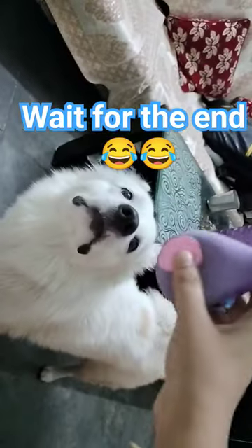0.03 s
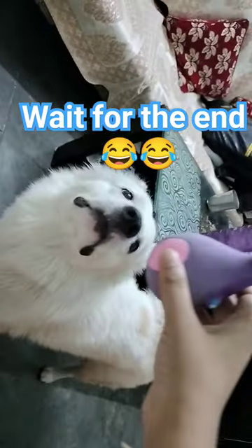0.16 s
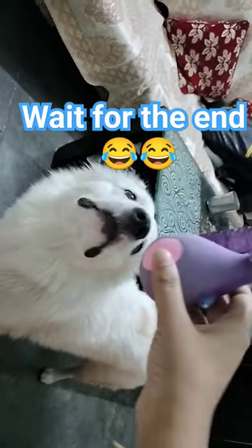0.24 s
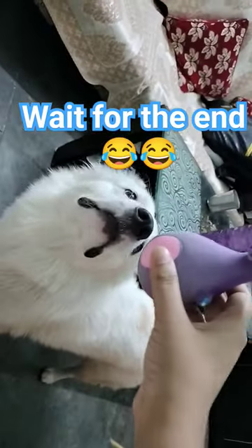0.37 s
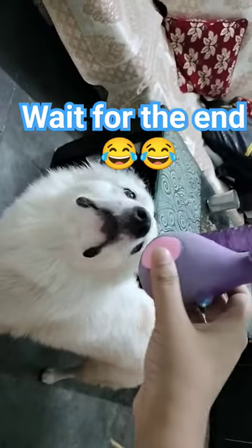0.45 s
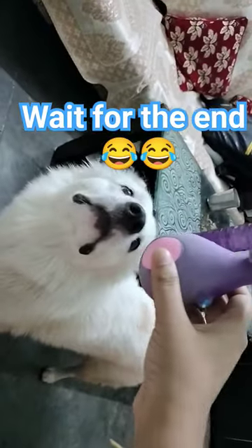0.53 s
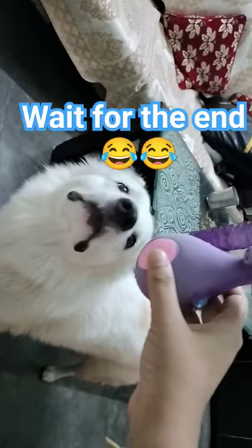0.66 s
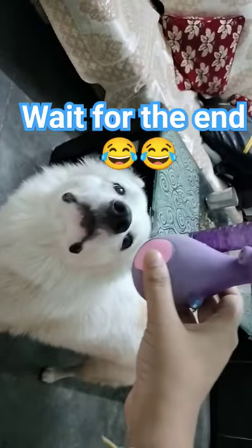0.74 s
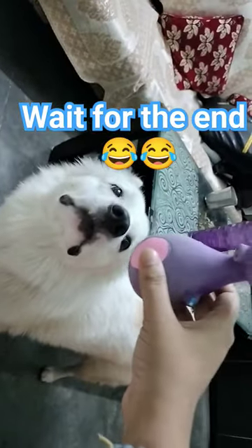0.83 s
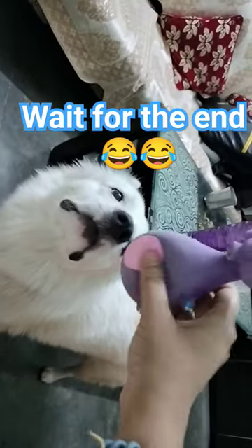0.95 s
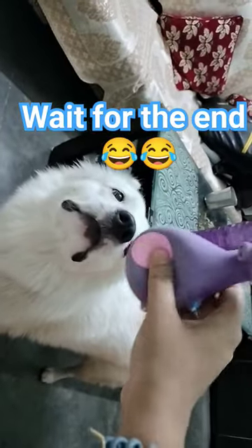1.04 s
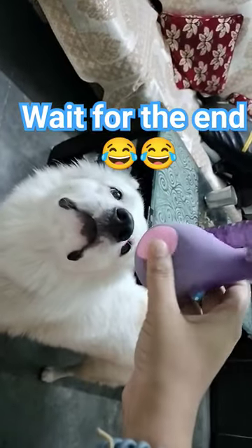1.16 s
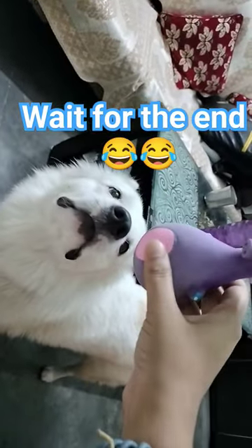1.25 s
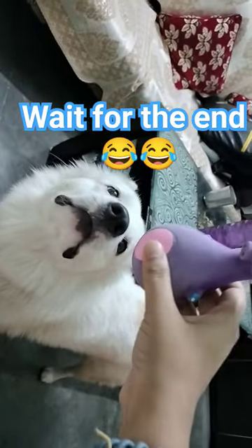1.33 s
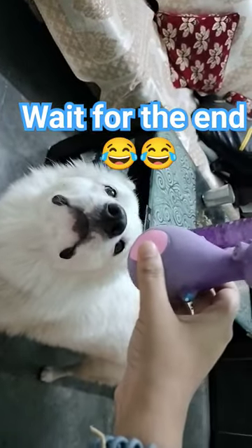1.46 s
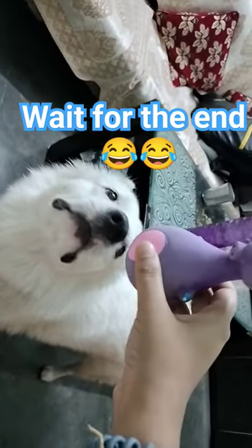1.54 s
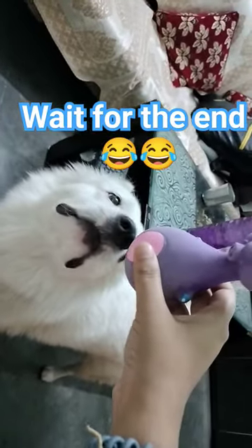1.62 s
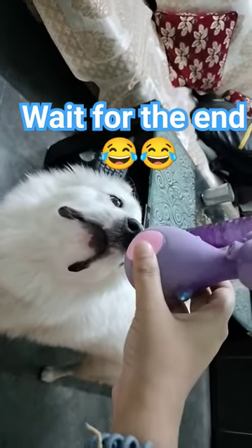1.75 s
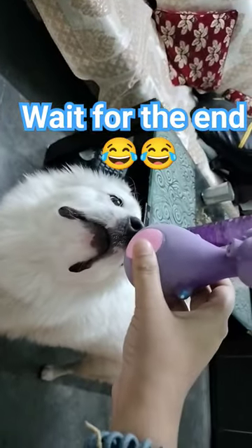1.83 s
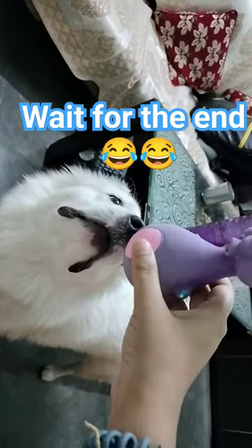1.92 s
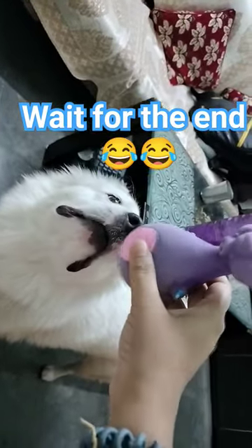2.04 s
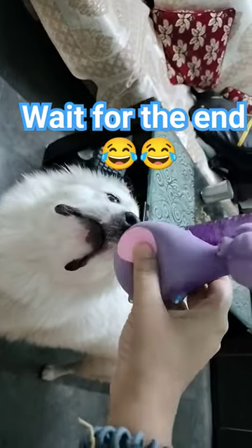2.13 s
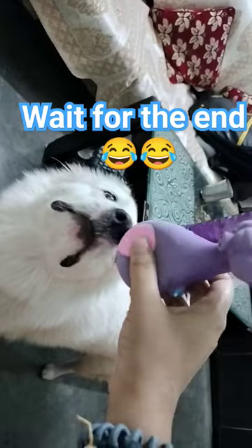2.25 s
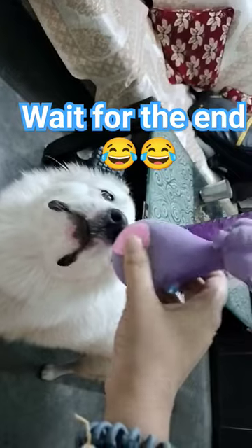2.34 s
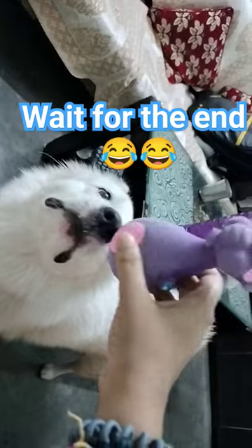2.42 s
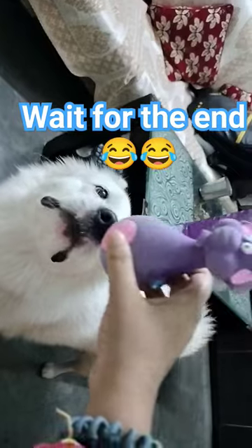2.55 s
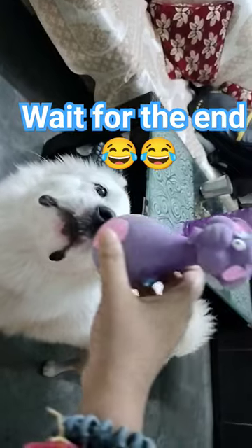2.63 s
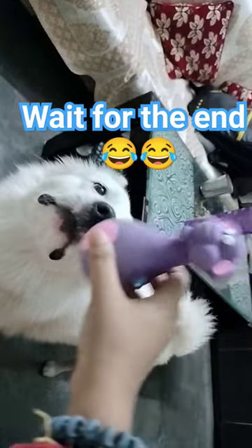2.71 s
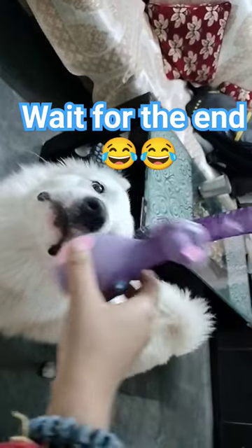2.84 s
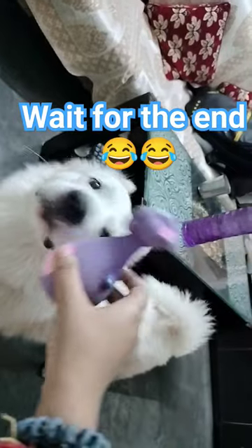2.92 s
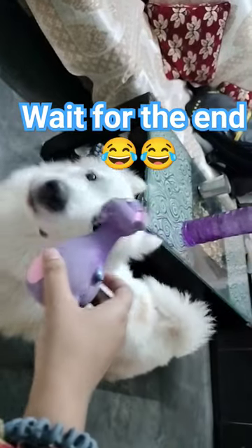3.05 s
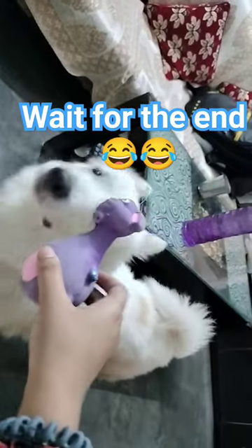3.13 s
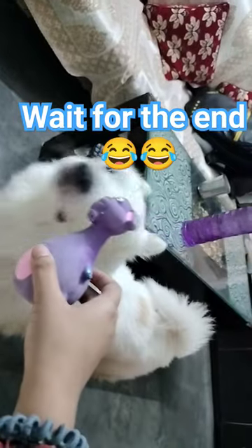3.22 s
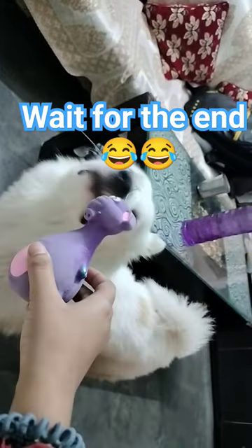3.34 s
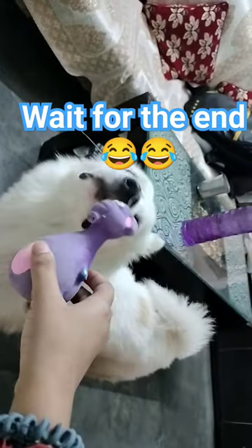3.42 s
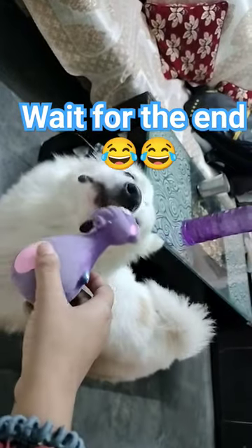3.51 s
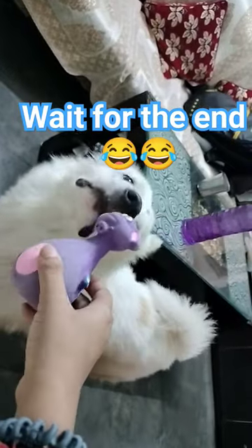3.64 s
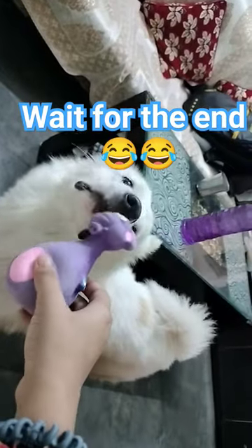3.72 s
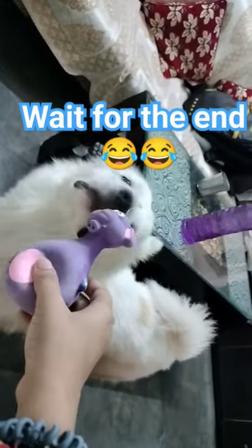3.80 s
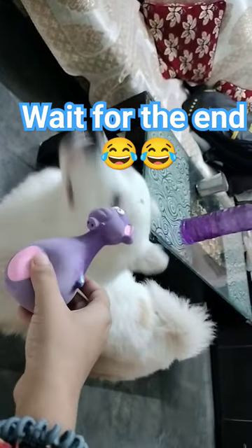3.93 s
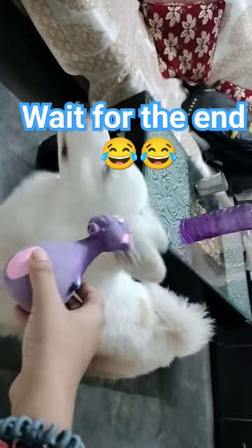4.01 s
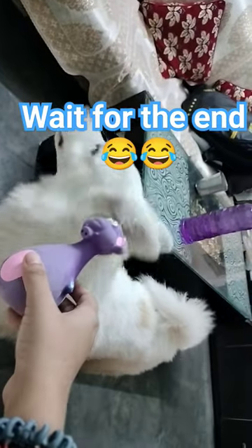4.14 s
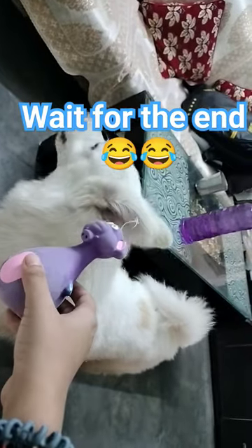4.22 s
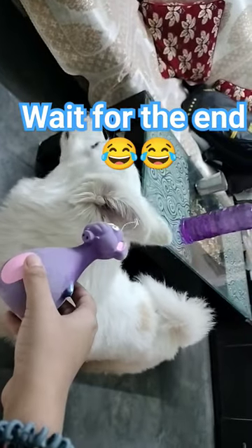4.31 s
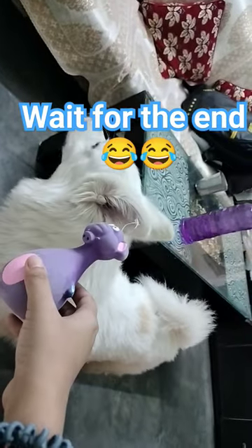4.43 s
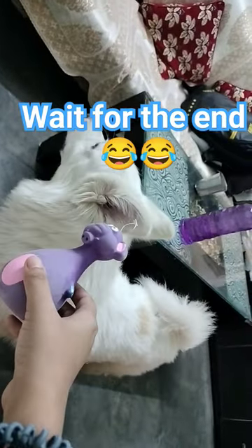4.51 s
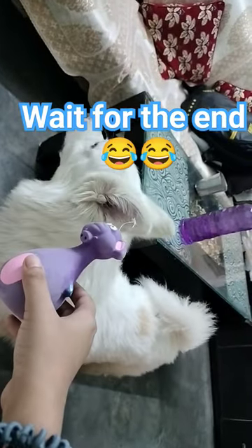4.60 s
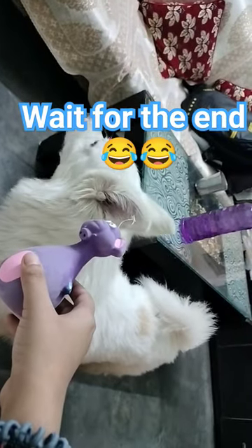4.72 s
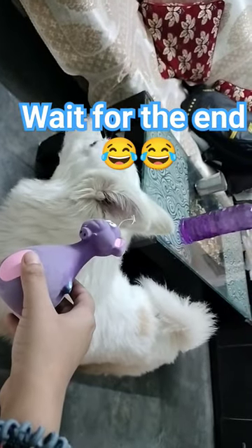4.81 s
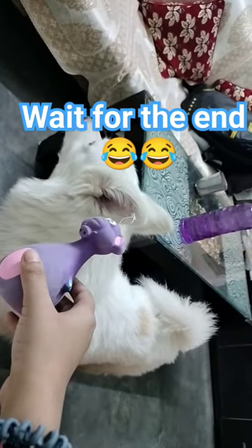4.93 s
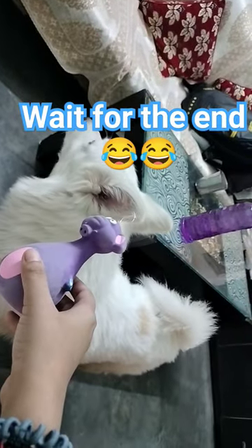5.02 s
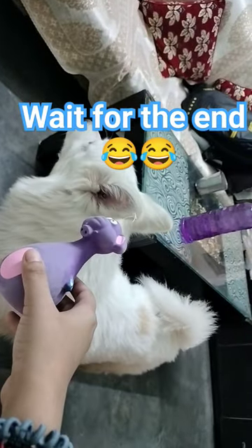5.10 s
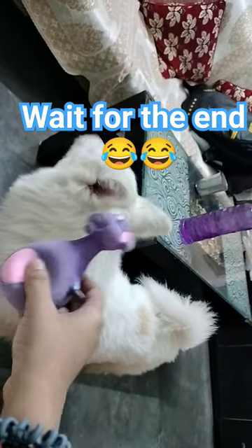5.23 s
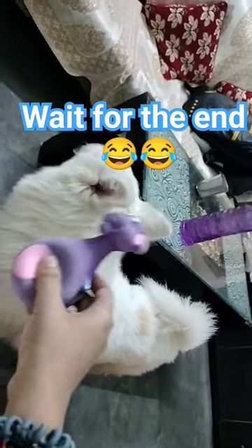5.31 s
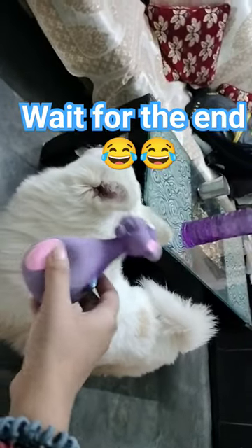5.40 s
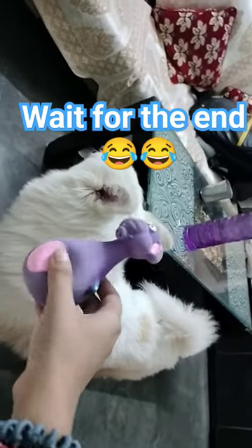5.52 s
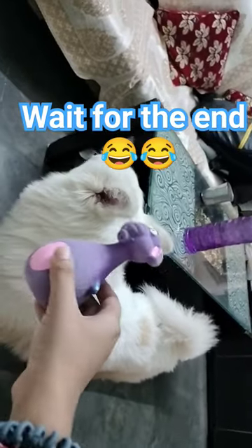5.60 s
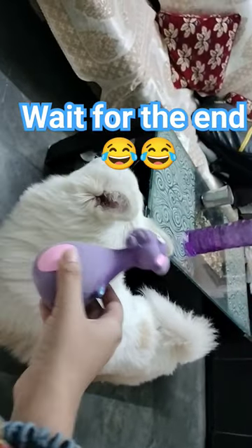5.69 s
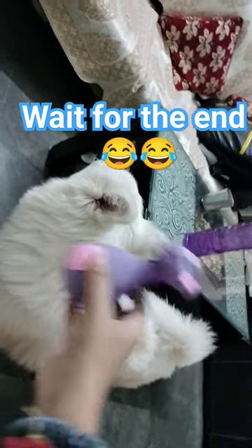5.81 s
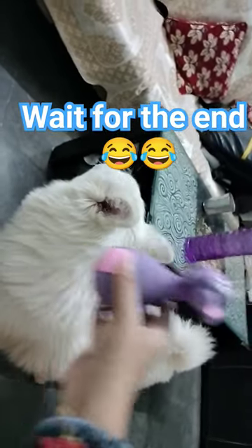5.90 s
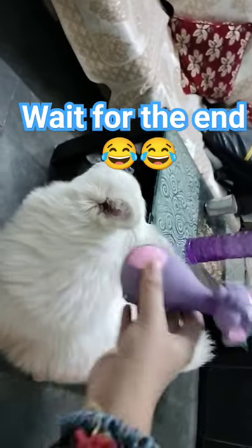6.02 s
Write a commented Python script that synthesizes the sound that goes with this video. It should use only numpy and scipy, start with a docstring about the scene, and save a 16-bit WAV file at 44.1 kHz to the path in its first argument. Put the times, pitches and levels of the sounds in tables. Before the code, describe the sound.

A rubber toy gives four high two-part squeaks and one softer single squeak, close up in a room with a low hum.

```python
"""A rubber toy squeaks as it is squeezed close to the microphone in a furnished room.
Air pushed out makes its reed buzz; the reed squeaks again, softer, as the body springs back
and sucks air in. More pressure gives a higher, louder note, and the squeaker's tube colours it.
The room rings on over low puffs of air, faint rustles and a steady household rumble."""
import sys
import numpy as np
from scipy import signal
from scipy.fft import rfft, irfft, next_fast_len
from scipy.io import wavfile
from scipy.ndimage import uniform_filter1d, map_coordinates

SR = 44100
rng = np.random.default_rng(int(sys.argv[2]) if len(sys.argv) > 2 else 0)


def unload_wav(signal):
    """Save mono or channel-first audio to the path in sys.argv[1] as 16-bit WAV at rate SR, clipped to [-1, 1]."""
    wavfile.write(
        sys.argv[1],
        SR,
        np.round(np.clip(np.atleast_2d(signal).T, -1, 1) * 32767).astype(np.int16),
    )


N = 267069
TOP_HZ = 15500

# Strokes of air, out and in. The "knee" is where the quick drop in pitch turns into a slow sag.
# (start [s], peak [s], knee [s], end [s], start pitch [Hz], peak pitch [Hz], end pitch [Hz],
#  stall time [s], level at the knee [dB], brightness [dB per overtone], octave boost [dB],
#  treble boost [dB], hiss [dB], swell above the knee [dB per 100 Hz])
SQUEEZES = [ (1.098, 1.161, 1.224, 1.236, 1291, 1780, 1270, .008, -39.5, -0.58, 1.5, -5, -4, 1.55),
            (2.225, 2.278, 2.329, 2.355, 1262, 1557, 1245, .012, -38.5, -.5, 3, 1, -5, 0.24),
            (3.908, 3.958, 4.004, 4.037, 1277, 1452, 1255, .012, -39, 1.37, 0.5, -7.5, -14, 2.5),
            (5.377, 5.429, 5.479, 5.507, 1280, 1559, 1245, .012, -39.5, 1.32, -2, -10.5, -11, 1.15), ]
REFILLS = [ (.128, .243, .296, .372, 1170, 1394, 1098, .008, -41.5, 0.25, -.5, -2.5, -13, 1.98),
           (1.263, 1.317, 1.386, 1.476, 1257, 1376, 1106, .008, -43, .1, -1.5, -2, -13.5, 1.8),
           (2.395, 2.428, 2.454, 2.617, 1200, 1243, 1147, .045, -43.5, -.1, 2, 2, -18.5, 3.7),
           (4.075, 4.142, 4.177, 4.245, 1174, 1342, 1102, .008, -42, 0.75, 0, -3, -23.5, 1.67),
           (5.538, 5.588, 5.618, 5.655, 1190, 1351, 1100, .008, -43, 0.42, 0.5, -3.5, -19, 2.94), ]
# How the reed answers to air going out and in: (knee pitch [Hz], rise curve [power], fall curve [power],
#  fade below the knee [dB per 100 Hz], brightening [dB per overtone per 100 Hz], stall loss [dB])
REED_BLOWN = (1342, 1.72, 1.9, 4.5, .4, 3)
REED_SUCKED = (1212, 2.55, 1.4, 8, .4, 5)
# How the tube colours the sound, each way: (frequency [Hz], gain [dB])
TUBE_BLOWN = [(600, -8.5), (1400, 4), (2900, 0.5), (4400, 6), (5300, 12.5), (6000, 18), (7200, 7),
              (8300, 3.5), (8700, -10), (9400, -12), (10500, -10), (12000, -7.5), (13500, -14),
              (15500, -23)]
TUBE_SUCKED = [(600, 4), (1300, 2), (2600, 2.5), (4000, 0.5), (5400, 7), (6000, 6), (6900, -7),
               (8300, -15.5), (8700, -21.5), (9400, -24.5), (10800, -12), (12000, -12), (13400, -22),
               (15500, -24)]
def rubber_toy():
    """The toy squeaks once as air is pushed out and once as it is drawn back in."""
    return reed(SQUEEZES, REED_BLOWN, TUBE_BLOWN) - reed(REFILLS, REED_SUCKED, TUBE_SUCKED)


# Air hissing past the reed: (frequency [Hz], gain [dB])
AIR_LEAK = [(300, -8.5), (2000, -16), (4000, -9.5), (7000, 1), (14000, 1.5)]
def reed(strokes, response, tube):
    """The reed chops the air into one sharp puff a cycle; air hisses past it; the tube colours both."""
    gate, (hz, level_db, bright_db, octave_db, treble_db, hiss_db) = reed_motion(strokes, response)
    unsteady = 1 + .0017 * wobble(300) + .0025 * wobble(45)
    phase = 2 * np.pi * np.cumsum(hz * unsteady) / SR
    bright_db = bright_db + .26 * wobble(60)  # the tone flutters
    buzz = np.zeros(N)
    for overtone in range(14):  # 0 is the base note
        overtone_hz = (overtone + 1) * hz
        treble_share = np.clip((overtone_hz - 8000) / 2000, 0, 1)
        overtone_db = bright_db * overtone + octave_db * (overtone == 1) + treble_db * treble_share
        buzz += amp(overtone_db) * np.cos((overtone + 1) * phase) * (overtone_hz < TOP_HZ)
    leak = coloured(rng.standard_normal(N), AIR_LEAK)
    hiss = amp(hiss_db) * leak * (1 + .77 * np.cos(phase))  # pulses with each cycle
    return coloured(np.sqrt(2) * gate * amp(level_db) * (buzz + hiss), tube)


# The hardest squeeze flips the reed to a higher note and back: (start [s], end [s], top pitch [Hz],
#  pitch bend kept [share], added level [dB], added brightness [dB per overtone], added octave [dB],
#  added treble [dB], added hiss [dB])
REED_FLIP = (1.1475, 1.192, 2018, .65, 3, -1.5, 4.5, .5, 2)
def reed_motion(strokes, response, catch_s=.004, open_s=.003, stop_s=.0037):
    """Pressure sets the reed's pitch and tone; as the pressure runs out, the reed stalls and stops."""
    knee_hz, rise, fall, fade_db, brighten_db, stall_db = response
    flip_start, flip_end, flip_hz, bend_kept, *flip_db = REED_FLIP
    tracks = np.outer([1250, -42, 0, 0, 0, -15], np.ones(N))  # pitch and five tone settings at rest
    gate = np.zeros(N)  # 0 is silent, 1 is sounding
    for stroke in strokes:
        start, _, _, end, _, peak_hz, _, stall_s, *tone_db, swell_db = stroke
        span = slice(int((start - catch_s / 2) * SR), int((end + stop_s) * SR))
        t = np.arange(span.start, span.stop) / SR
        hz = pitch_arc(t, *stroke[:7], knee_hz, rise, fall)
        stalled = np.clip(1 + (t - end) / stall_s, 0, 1.3) ** 2
        above_knee = (hz - knee_hz) / 100
        tone = np.outer(tone_db, np.ones(len(t)))  # row 0 is level, row 1 is brightness
        tone[0] += np.where(above_knee > 0, swell_db, fade_db) * above_knee - stall_db * stalled
        tone[1] += brighten_db * above_knee - .6 * np.exp(-(t - start) / open_s)  # overtones start late
        flipped = (t > flip_start) & (t < flip_end)
        tone += np.outer(flip_db, flipped)
        hz = np.where(flipped, flip_hz + bend_kept * (hz - peak_hz), hz)
        hz *= 1 - .045 * stalled  # the note dives as the reed stalls
        tracks[:, span] = [hz, *tone]
        fade_in = (.5 + (t - start) / catch_s) ** 2
        fade_out = .5 + (end - t) / (2 * stop_s)
        gate[span] = np.clip(np.minimum(fade_in, fade_out), 0, 1)
    return gate, uniform_filter1d(tracks, size=130, axis=1)  # smoothed: a flip takes a few cycles


def pitch_arc(t, start, peak, knee, end, start_hz, peak_hz, end_hz, knee_hz, rise, fall):
    """Pitch follows pressure: it rounds over a peak, drops to the knee, then sags in a straight line."""
    progress = lambda a, b: np.clip((t - a) / (b - a), 0, 1)
    climb_left = (peak_hz - start_hz) * progress(peak, start) ** rise
    drop = (peak_hz - knee_hz) * progress(peak, knee) ** fall
    sag = (knee_hz - end_hz) * progress(knee, end)
    return peak_hz - climb_left - drop - sag


# Echoes at each place the hand holds the toy: (start [s], nearby surfaces [dB], walls [dB])
TOY_PLACES = [(0, -11.5, -10), (.9, -16.5, -10), (1.9, -8.5, -9), (3.5, -21, -13.5), (5.001, -13, -11.5)]
# How long the walls ring: (frequency [Hz], time to fade by 60 dB [s])
WALL_RING = [(1000, 0.42), (3000, 0.34), (6000, 0.3), (9000, .35), (14000, 0.12)]
# The colour of all the echoes: (frequency [Hz], gain [dB])
ECHO_COLOUR = [(1000, -5.5), (2200, -6.5), (4000, -1), (6000, 3), (9000, -2), (14000, 12.5)]
def room_echo(squeaks, delay_s=.002):
    """Floor and furniture echo briefly, the walls for longer; the mix changes as the hand moves."""
    place = np.searchsorted(np.transpose(TOY_PLACES)[0], np.arange(N) / SR, side="right") - 1
    echoes = np.zeros(N)
    for k, (_, near_db, wall_db) in enumerate(TOY_PLACES):
        walls = amp(wall_db) * echo_tail(WALL_RING)
        nearby = amp(near_db) * echo_tail([(1000, .13), (10000, .0086)])
        delayed = np.pad(squeaks * (place == k), (int(delay_s * SR), 0))
        echoes += signal.fftconvolve(delayed, walls + nearby)[:N]
    return coloured(echoes, ECHO_COLOUR)


def echo_tail(ring_times, length_s=.75):
    """Many echoes blur into noise in which each frequency dies away at its own speed."""
    hz, t, spectrum = signal.stft(rng.standard_normal(int(length_s * SR)), SR, nperseg=128)
    decay = amp(-60 * t / curve_at(ring_times, hz)[:, None])
    tail = signal.istft(spectrum * decay, SR, nperseg=128)[1]
    return tail / np.linalg.norm(tail)


# Low puffs: (start [s], length [s], level [dB])
AIR_PUFFS = [(1.1, 0.12, -42.5), (1.19, 0.097, -41.5), (2.26, 0.1, -47.5), (2.41, 0.047, -44.5),
             (2.93, 0.052, -45.5), (3.26, 0.079, -46.5), (3.92, 0.16, -46.5), (5.38, 0.1, -39.5),
             (5.45, 0.12, -49.5)]
def air_puffs():
    """Puffs of air and hand movement reach the microphone as soft, deep bumps."""
    return noise_swells(AIR_PUFFS, low_hz=21, high_hz=50)


# Faint rustles: (start [s], length [s], level [dB])
FAINT_RUSTLES = [(.545, 0.08, -72), (3.03, .12, -86), (3.34, 0.12, -77)]
def rustles():
    """Short wisps of high noise come and go."""
    return noise_swells(FAINT_RUSTLES, low_hz=5300, high_hz=7500)


# The colours of the background rumble and hiss: (frequency [Hz], relative level [dB])
RUMBLE_COLOUR = [(12, -49.5), (20, -16), (91, -2.5), (120, -8.5), (149, 0), (242, -8), (285, -4),
                 (329, -10.5), (401, -6), (545, -17), (857, -13), (1500, -30), (1950, -64), (3300, -120)]
HISS_COLOUR = [(900, -28), (1500, -2.5), (1720, -1), (1940, -7.5), (2890, -17), (4490, -16), (5360, -20.5),
               (7410, -15), (9370, -29.5), (15600, -33)]
def household(rumble_db=-56.5, hiss_db=-76.5):
    """The steady rumble and hiss of the room, each drifting gently in level."""
    rumble = unit(coloured(patchy_noise(depth_db=2.5), RUMBLE_COLOUR))
    hiss = unit(coloured(rng.standard_normal(N), HISS_COLOUR))
    return amp(rumble_db + .54 * wobble(3)) * rumble + amp(hiss_db + 1.4 * wobble(1.3)) * hiss


def patchy_noise(depth_db):
    """Noise that is a little louder or softer in patches of time and frequency."""
    spectrum = signal.stft(rng.standard_normal(N + 1024), nperseg=1024)[2]
    patches = uniform_filter1d(rng.standard_normal(spectrum.shape), size=5, axis=0)
    patches = uniform_filter1d(patches, size=8, axis=1)
    return signal.istft(spectrum * amp(depth_db * unit(patches)), nperseg=1024)[1][:N]


def noise_swells(rows, low_hz, high_hz):
    """A band of noise that rises and falls smoothly once for each row."""
    t = np.arange(N) / SR
    loudness = sum(amp(db) * np.sin(np.pi * np.clip((t - start) / length, 0, 1)) ** 2
                   for start, length, db in rows)
    band = signal.butter(2, [low_hz, high_hz], "bandpass", fs=SR, output="sos")
    return loudness * unit(signal.sosfilt(band, rng.standard_normal(N)))


def coloured(x, colour):
    """Filter x by (frequency [Hz], gain [dB]) points, so it rings only after a sound, never before."""
    size = next_fast_len(N + SR // 2)
    gain = amp(curve_at(colour, np.fft.rfftfreq(size, 1 / SR)))
    cepstrum = irfft(np.log(gain + 1e-6), size)
    cepstrum[1:size // 2] *= 2  # move the early half of the ringing to the late side
    cepstrum[size // 2 + 1:] = 0
    return irfft(rfft(x, size) * np.exp(rfft(cepstrum)), size)[:N]


def curve_at(points, hz):
    """Read between (frequency [Hz], value) points, with octaves evenly spaced."""
    point_hz, values = np.transpose(points)
    return np.interp(np.log(hz + 1), np.log(point_hz + 1), values)


def wobble(rate):
    """A smooth curve through `rate` random points a second."""
    return map_coordinates(rng.standard_normal(int(N * rate / SR) + 4), [np.arange(N) * rate / SR])


def amp(db):
    """Turn decibels into a number to multiply by."""
    return 10 ** (np.asarray(db) / 20)


def unit(x):
    """Scale x to an average strength (rms) of 1."""
    return x / np.sqrt(np.mean(x ** 2) + 1e-20)


def scene():
    """The toy, its echo and the background, the same in both ears."""
    squeaks = rubber_toy()
    mono = squeaks + room_echo(squeaks) + household() + air_puffs() + rustles()
    return np.array([mono, mono])


def record(dry, bend=.13, ceiling=.75, low_cut_hz=8):
    """The microphone bends loud sound a little and drops the very lowest and highest frequencies."""
    rounded = dry / (1 + np.abs(dry / ceiling) ** 5) ** (1 / 5)  # softens the loudest peaks
    bent = rounded + bend * rounded ** 2  # adds a low thump under loud squeaks
    size = next_fast_len(N + SR // 4)
    hz = np.fft.rfftfreq(size, 1 / SR)
    low_cut = 1j * hz / (low_cut_hz + 1j * hz)
    return irfft(rfft(bent, size) * low_cut * (hz < TOP_HZ), size)[:, :N]


dry = scene()
out = record(dry)
unload_wav(out)
```